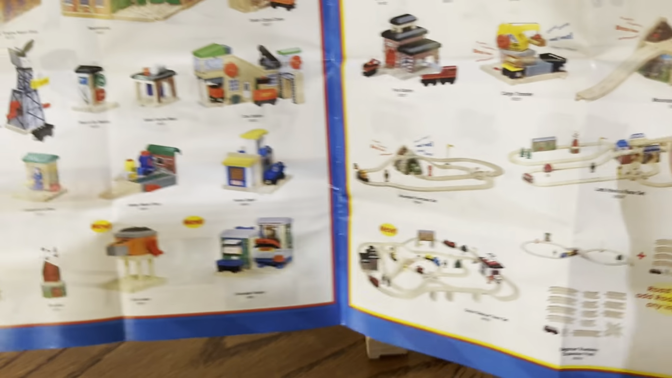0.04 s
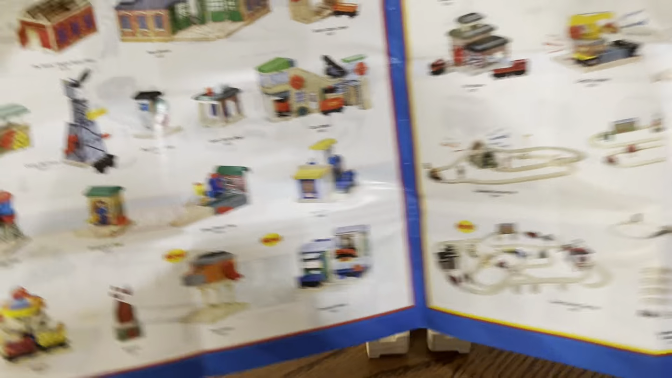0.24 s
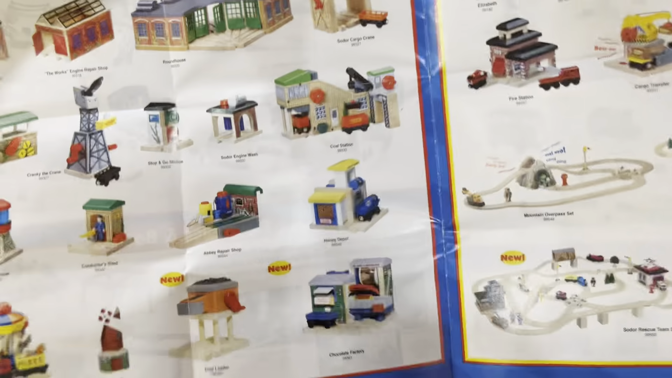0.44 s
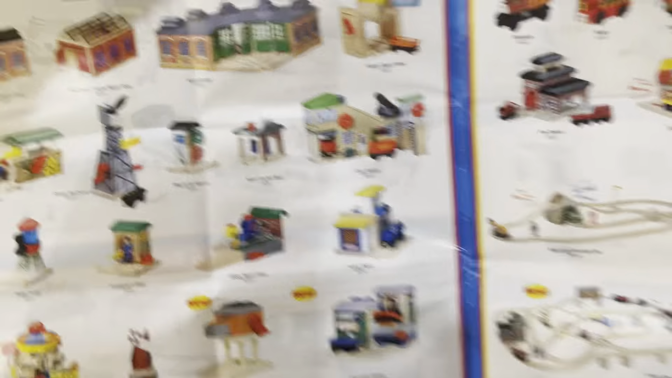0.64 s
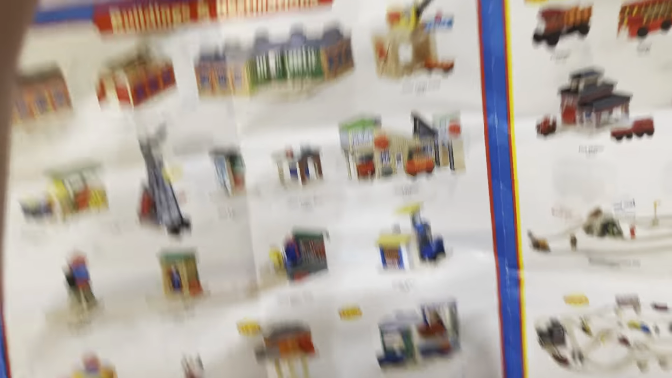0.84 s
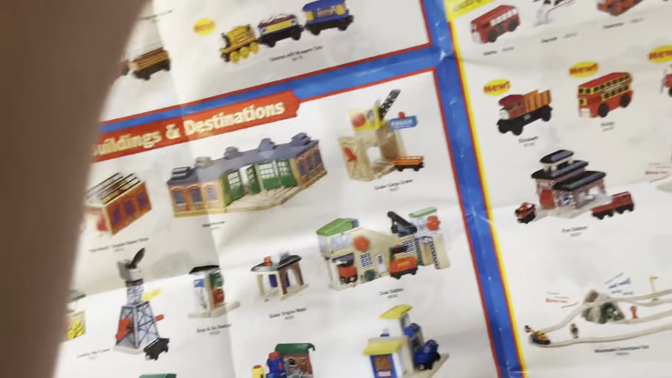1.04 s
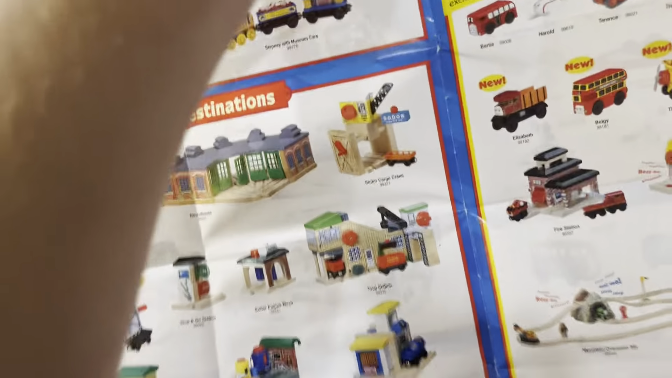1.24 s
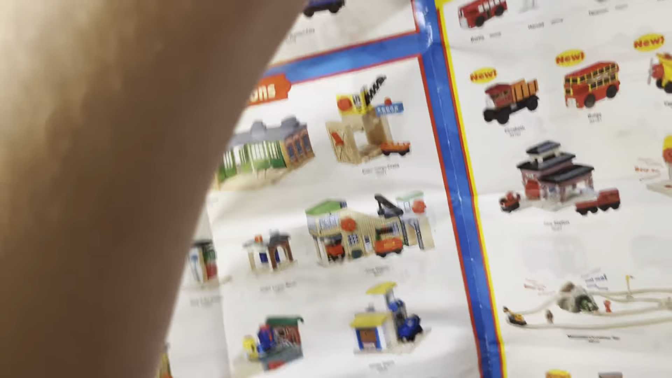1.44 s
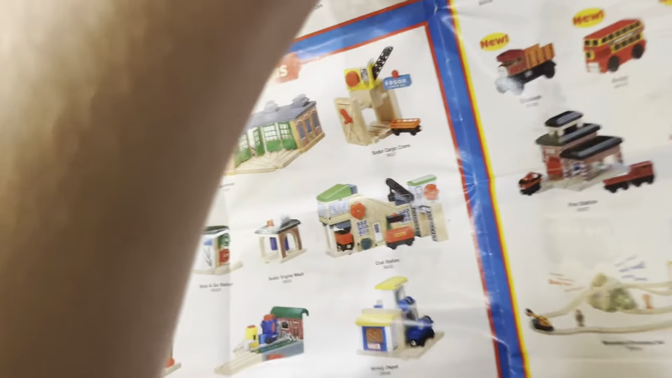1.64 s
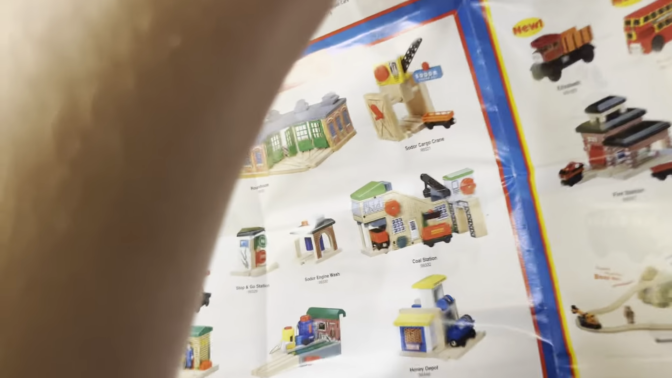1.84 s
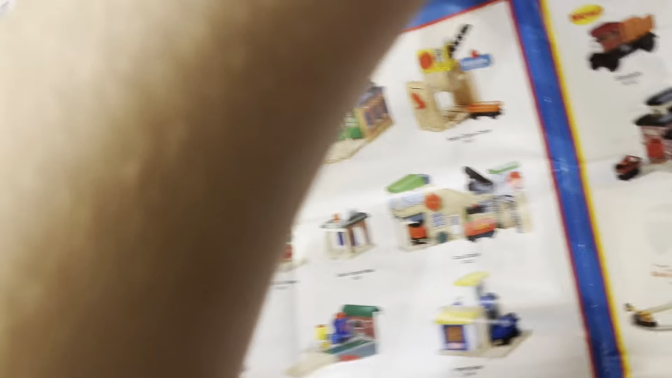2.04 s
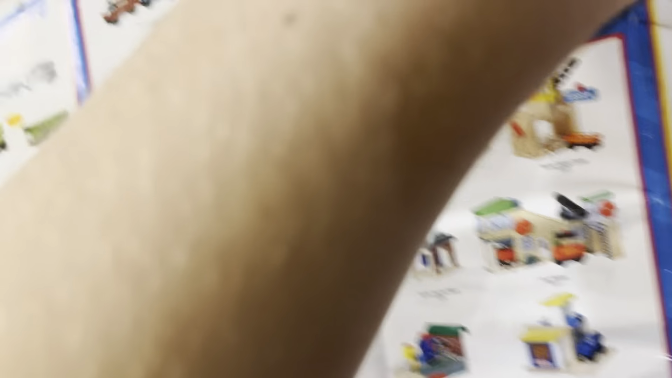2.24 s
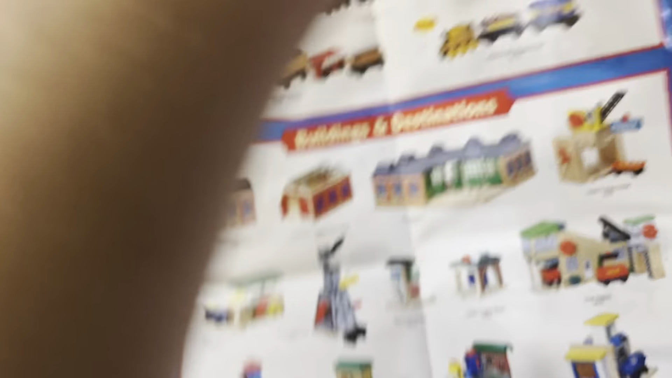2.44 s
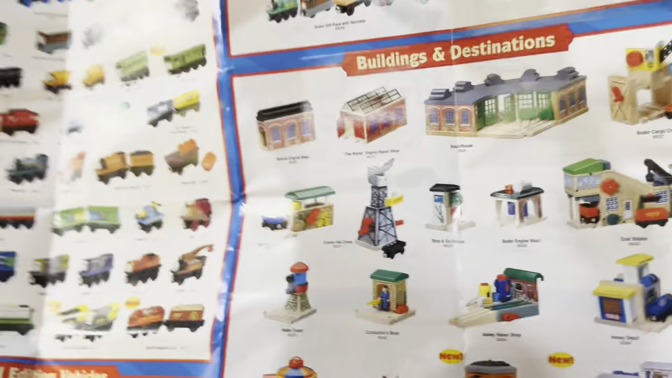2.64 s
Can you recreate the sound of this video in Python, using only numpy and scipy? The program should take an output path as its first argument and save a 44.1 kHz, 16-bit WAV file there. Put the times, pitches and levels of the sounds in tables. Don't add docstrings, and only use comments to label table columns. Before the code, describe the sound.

A large folded paper leaflet is opened and shifted, crinkling and snapping sharply close by.

```python
import sys
import numpy as np
from scipy import signal
from scipy.fft import rfft, irfft, next_fast_len
from scipy.io import wavfile
from scipy.ndimage import uniform_filter1d

SR = 44100
rng = np.random.default_rng(int(sys.argv[2]) if len(sys.argv) > 2 else 0)


def digitize_waveform(pressure):
    field = np.atleast_2d(pressure).T
    bounded = np.clip(field, -1, 1)
    quanta = np.round(bounded * 32767).astype(np.int16)
    wavfile.write(sys.argv[1], SR, quanta)


def natural_amplitude(level_db):
    exponent = np.asarray(level_db, float) / 20
    return 10 ** exponent


N = 119070


def evened(x):
    return x / np.sqrt(np.mean(x ** 2) + 1e-20)


def smooth_twice(x, size, axis=-1):
    return uniform_filter1d(uniform_filter1d(x, size=size, axis=axis), size=size, axis=axis)


def read(points, hz):
    f, value = np.transpose(points)
    return np.interp(np.log(hz + 1), np.log(f + 1), value)


def add(mix, start_s, sound):
    part = mix[:, max(round(start_s * SR), 0):][:, :sound.shape[1]]
    part += sound[:, :part.shape[1]]


# [freq_hz, level_db]
SHEET_COLOUR = [(150, -9.5), (350, 2), (1000, 6), (2400, -1.5), (4400, -1.5), (6000, -5.5), (12000, -3),
                (16500, -9)]
# [freq_hz, t60_s]
SHEET_DECAY = [(150, 0.14), (500, 0.035), (1500, 0.032), (4500, 0.017), (12000, 0.0017)]
BODY_HZ, MID_HZ, SIZZLE_HZ = 554, 2570, 7900
BODY_DB, SIZZLE_DB = 8.5, 18.5
RISE_TURNS = 0.27


def snap(level_db, body_db, sizzle_db, count=100):
    t = np.arange(2600) / SR
    step, size, turn_left, turn_right = rng.random((4, count))
    hz = 150 * 108 ** ((np.arange(count) + step) / count) ** .8
    sizzle_db = sizzle_db + SIZZLE_DB
    colour = [(BODY_HZ, body_db + BODY_DB), (MID_HZ, 0), (SIZZLE_HZ, sizzle_db), (2 * SIZZLE_HZ, 1.9 * sizzle_db)]
    gain = natural_amplitude(read(SHEET_COLOUR, hz) + read(colour, hz) + 9.2 * size)
    phase = np.exp(2j * np.pi * np.array([turn_left, turn_right]))
    modes = np.exp(np.outer(2j * np.pi * hz - np.log(1000) / read(SHEET_DECAY, hz), t))
    rise = np.minimum(t / (RISE_TURNS / hz[:, None] + 0.0006), 1)
    sound = ((gain * phase) @ (modes * rise)).real
    return natural_amplitude(level_db) * sound / abs(sound[0]).max()


# [start_s, level_db, body_db, sizzle_db]
SNAPS = [(0.17, -31.5, -7.5, -34), (0.253, -19, -19, -21.5), (0.293, -16.5, -18, -13.5),
         (0.361, -34, -3, -11), (0.406, -30, 3.5, -11), (0.439, -28, -22.5, -26.5), (0.518, -22, -13, -1),
         (0.546, -29, -16, -54), (0.567, -11.5, -13.5, -10), (0.67, -21, -11.5, -10.5),
         (0.789, -29, 2, -12), (0.809, -7.5, -29, -2.5), (0.865, -11.5, -18.5, -4),
         (0.891, -13.5, -18, -22.5), (1.025, -32, -4, -47), (1.172, -27.5, -11.5, -19),
         (1.369, -33, -2, -11.5), (1.391, -25.5, -10, -12.5), (1.417, -26, -20, -35),
         (1.442, -9.5, -25.5, -7.5), (1.702, -27.5, -2, -41), (1.758, -27, 0.5, -7), (1.881, -37, 5, -51),
         (1.898, -17, -8.5, -50), (2.05, -32, -4, -34), (2.09, -18.5, -17.5, -14),
         (2.306, -30.5, -6, -24.5), (2.337, -31, -8, -13.5), (2.397, -24, -18, -39),
         (2.424, -26.5, -15, -15.5),
         (.003, -27, -16.5, -31), (0.186, -36.5, 26, 2), (.217, -35.5, -3.5, -16.5),
         (0.525, -23, -15.5, -15.5), (.604, -44, -9, -27.5), (0.801, -20, -17.5, -27),
         (0.899, -19, -13.5, -22.5), (0.994, -28.5, -7, -10), (1.664, -35, -9.5, -52),
         (1.809, -40.5, -11.5, -10.5), (1.956, -31, -2.5, -19), (2.063, -29.5, -10, -19),
         (2.262, -45, -7, -19), (2.543, -33.5, 17, -33), (2.696, -41, -10, -20)]
LEAD_S, CLUMP_S_PER_DB, SIDE_DB = 0.0012, .0004, -6


def creases():
    out = np.zeros((2, N))
    for start_s, level_db, body_db, sizzle_db in SNAPS:
        sound = snap(0, body_db, sizzle_db)
        dull_db = np.clip(body_db - sizzle_db + 13.0, 6, 30)
        clump = np.zeros((2, 4000))
        add(clump, LEAD_S, sound)
        for when, size in rng.random((8, 2)):
            spread_s = CLUMP_S_PER_DB * dull_db if size < .8 else 0
            late_s = LEAD_S + spread_s * when if size < .8 else LEAD_S * when
            side_gain = natural_amplitude(SIDE_DB - 9.3 * size - 60 / dull_db) * np.sign(when - .5)
            add(clump, late_s, side_gain * sound)
        add(out, start_s - LEAD_S, natural_amplitude(level_db) * clump / abs(clump[0]).max())
    return out


# [start_s, length_s, slide_db, bend_db]
STROKES = [(-.02, 0.02, -46.5, -45), (0.108, 0.098, -83, -53), (0.224, 0.081, -81, -36),
           (0.345, 0.11, -66, -43), (0.471, 0.14, -58, -38), (0.608, 0.15, -68.5, -52),
           (0.763, 0.15, -53.5, -37.5), (0.834, 0.16, -48.5, -44.5), (0.994, 0.15, -66.5, -49),
           (1.158, 0.031, -49.5, -45), (1.212, 0.13, -65.5, -55.5), (1.341, 0.13, -58, -41),
           (1.462, 0.12, -65, -63), (1.617, 0.11, -61.5, -53), (1.734, 0.053, -49.5, -41.5),
           (1.894, 0.04, -64, -40), (2.037, 0.067, -58.5, -43.5), (2.184, .2, -58.5, -49),
           (2.406, 0.061, -50.5, -53), (2.5, 0.041, -59.5, -53), (2.56, 0.11, -65, -72)]
SLIDE_COLUMN, BEND_COLUMN = 2, 3
STROKE_RISE_S, STROKE_FALL_S, SLIDE_FALL_S = 0.028, 0.025, 0.022


def effort(column, fall_s=STROKE_FALL_S):
    t, power = np.arange(N) / SR, np.zeros(N)
    for row in STROKES:
        start_s, length_s = row[:2]
        rise = np.clip((t - start_s) / STROKE_RISE_S, 0, 1) ** 2
        fall = np.exp(-np.maximum(t - start_s - length_s, 0) / fall_s)
        power += (natural_amplitude(row[column]) * rise * fall) ** 2
    return np.sqrt(power)


def crinkle(per_s=500, spread_db=4.5, level_db=2.5):
    clumps = natural_amplitude(5 * evened(uniform_filter1d(rng.standard_normal(N), size=500)))
    hits = rng.random(N) < per_s / SR * clumps
    size = evened(natural_amplitude(spread_db * np.minimum(rng.exponential(1, N), 3)) * hits)
    size = size * np.sqrt(effort(SLIDE_COLUMN) * effort(BEND_COLUMN))
    kind, out = rng.integers(0, 12, N), np.zeros((2, N))
    for k in range(12):
        grain = snap(0, -16 + k, -25 - 1.5 * k, count=40)[:, :1500]
        grain = grain / np.linalg.norm(grain[0])
        out += signal.oaconvolve((size * (kind == k))[None], grain, axes=1)[:, :N]
    return natural_amplitude(level_db) * out


# [start_s, level_db, pitch_hz]
FLAPS = [(0.021, -44.5, 69), (0.216, -26, 60.6), (0.333, -29, 57.6), (.39, -48, 91.5), (.53, -35, 62.5),
         (0.663, -30.5, 87), (0.788, -20.5, 82.3), (0.918, -33, 92.6), (1.166, -20, 64.9),
         (1.252, -30, 71.6), (1.374, -39, 64), (1.441, -28.5, 66), (1.702, -32.5, 118), (1.76, -39.5, 117),
         (2.059, -34.5, 85.5), (2.311, -36, 82), (2.348, -27.5, 63), (2.422, -36.5, 68.3),
         (2.539, -34, 283)]
FLAP_T60_S, FLAP_RISE_S, FLAP_DB = 0.12, 0.0068, 1.5


def flaps():
    out, t = np.zeros((2, N)), np.arange(8000) / SR
    for start_s, level_db, pitch_hz in FLAPS:
        swing = np.sin(2 * np.pi * pitch_hz * t * (1 - 0.2 * t) + np.array([[0], [1.3]]))
        decay_db = 60 * t * max(pitch_hz / 120, 1) / FLAP_T60_S
        rise = 1 - np.exp(-(t / FLAP_RISE_S) ** 2)
        add(out, start_s, natural_amplitude(level_db + FLAP_DB - decay_db) * rise * swing)
    return out


def rings(table, gain_db, turns):
    out, t = np.zeros((2, N)), np.arange(2000) / SR
    for start_s, level_db, pitch_hz in table:
        off, turn = rng.uniform(-1, 1, 3), rng.random((2, 3))
        hz = pitch_hz * (1 + 0.035 * off * [0, 1, 1])
        modes = np.exp(2j * np.pi * np.outer(hz, t))
        sound = ((np.exp(2j * np.pi * turn) * [1, .5, .5]) @ modes).real
        sound = sound * np.minimum(t * pitch_hz / 1.5, 1) * natural_amplitude(-60 * t * pitch_hz / turns)
        add(out, start_s, natural_amplitude(level_db + gain_db) * sound / abs(sound[0]).max())
    return out


# [start_s, level_db, pitch_hz]
PANELS = [(0.17, -43, 910), (0.252, -24, 1380), (0.293, -22, 1400), (0.424, -38, 825), (0.439, -23, 1540),
          (0.487, -38, 856), (0.547, -21.5, 950), (0.67, -26, 890), (0.89, -14.5, 590), (0.898, -18, 970),
          (0.966, -39, 1080), (1.026, -33, 930), (1.391, -37, 840), (1.418, -25.5, 843),
          (1.663, -31.5, 1440), (1.701, -35, 756), (1.726, -31.5, 660), (1.79, -33, 807),
          (1.904, -20.5, 1050), (1.934, -29, 810), (2.063, -25.5, 778), (2.088, -21.5, 676),
          (2.262, -36, 1210), (2.306, -29, 1420), (2.397, -25, 944), (2.423, -24, 1400), (2.456, -36, 1110)]


def panels():
    return rings(PANELS, gain_db=-4, turns=14)


# [start_s, level_db, pitch_hz]
FACETS = [(0.0867, -48, 2600), (0.2523, -31, 2050), (0.2942, -17, 4160), (0.405, -38, 2500),
          (0.4389, -31, 3620), (0.5452, -28, 2070), (0.5681, -19, 4000), (0.6704, -22, 2300),
          (0.8096, -13, 4440), (0.8649, -12, 2390), (0.8904, -16.5, 2270), (0.9368, -36, 1970),
          (1.4162, -32, 2260), (1.4416, -17, 2480), (1.956, -39, 2290), (2.0892, -18.5, 3770),
          (2.3376, -42, 2150), (2.4239, -30, 2360)]


def facets():
    return rings(FACETS, gain_db=-4, turns=20)


# [start_s, length_s, level_db, pitch_hz]
RASPS = [
    (.508, 0.024, -42, 3060),
    (0.42, 0.0083, -43, 8000),
    (.98, .022, -46.5, 8100),
    (0.69, .03, -45.5, 1700),
    (1.78, 0.05, -52, 7300),
    (2.296, 0.048, -52, 3900),
    (2.6, .015, -52, 4300),
    (2.44, 0.073, -50.5, 7300),
]
RASP_SLIPS_PER_S, RASP_WIDTH = 2800, .4


def rasps():
    out, t = np.zeros((2, N)), np.arange(4000) / SR
    for start_s, length_s, level_db, pitch_hz in RASPS:
        slips = rng.standard_normal((2, 4000)) * (.2 + (rng.random(4000) < RASP_SLIPS_PER_S / SR))
        band_hz = [pitch_hz / (1 + RASP_WIDTH), pitch_hz * (1 + RASP_WIDTH)]
        sos = signal.butter(2, band_hz, "band", fs=SR, output="sos")
        swell = np.sin(np.pi * np.minimum(t / length_s, 1)) ** 2
        add(out, start_s, natural_amplitude(level_db) * evened(signal.sosfilt(sos, slips)) * swell)
    return out


def texture(colour, patchy_db, flicker_db, size):
    frames, hz = 4 * N // size + 5, np.fft.rfftfreq(size, 1 / SR)
    a, b, c, d, patches = rng.standard_normal((frames, len(hz), 5)).T
    patches = uniform_filter1d(uniform_filter1d(patches, size=9, axis=0), size=9, axis=1)
    flicker = evened(uniform_filter1d(rng.standard_normal(frames), size=5))
    level_db = read(colour, hz)[:, None] + patchy_db * evened(patches) + flicker_db * flicker
    z = np.array([a + 1j * b, c + 1j * d]) * natural_amplitude(level_db)
    return evened(signal.istft(z, nperseg=size, noverlap=3 * size // 4)[1][:, :N])


# [freq_hz, level_db]
HISS = [(300, -18), (1000, -24), (3000, -3), (6000, -6), (8500, 4), (11500, -12.5), (14300, -9.5),
        (15300, -29.5)]


def slide():
    hiss = texture(HISS, patchy_db=2.5, flicker_db=2.5, size=256)
    return effort(SLIDE_COLUMN, SLIDE_FALL_S) * hiss


# [freq_hz, level_db]
RUMBLE = [(25, -37.5), (62, 1.5), (120, -1.5), (190, -12.5), (320, -11.5), (600, -24), (1300, -37),
          (4000, -48.5)]


def bend():
    return effort(BEND_COLUMN) * texture(RUMBLE, patchy_db=2.5, flicker_db=1.5, size=1024)


# [freq_hz, t60_s]
ROOM_DECAY = [(100, 0.44), (1000, 0.18), (14000, 0.089)]
ROOM_DB = -14


def room(x):
    taps = np.zeros((2, SR // 2))
    at = np.arange(120, SR // 2 - 20, 20)
    signs = rng.choice([-1., 1.], (2, len(at)))
    np.put_along_axis(taps, at + rng.integers(0, 20, (2, len(at))), signs, 1)
    hz, t, z = signal.stft(taps, SR, nperseg=128)
    tail = signal.istft(z * natural_amplitude(-60 * t / read(ROOM_DECAY, hz)[:, None]), SR, nperseg=128)[1]
    return natural_amplitude(ROOM_DB) * signal.fftconvolve(x[:1], tail / np.linalg.norm(tail[0]), axes=1)[:, :N]


# [freq_hz, level_db]
AIR = [(25, -29), (65, 12), (130, -14.5), (300, -12.5), (1500, -18), (6000, -30), (14300, -41.5),
       (15300, -55.5)]
AIR_DB = -61.5


def still_air():
    return natural_amplitude(AIR_DB) * texture(AIR, patchy_db=1.5, flicker_db=1, size=1024)


def scene():
    paper = creases() + crinkle() + flaps() + panels() + facets() + rasps()
    return paper + room(paper) + slide() + bend() + still_air()


# [freq_hz, left_lead_rad]
PORT_PHASE = [(0, 0), (1100, -.1), (1550, -2.3), (1900, .3), (4400, 1), (6500, -1), (7800, -3),
              (8800, -3.25), (11000, -6.05), (13000, -6.5), (14800, -9.1), (16500, -10.3)]
# [freq_hz, likeness_0_to_1]
PORT_LIKENESS = [(60, .98), (250, .8), (700, .45), (1500, .6), (3000, .75), (5500, .85), (7600, .9995)]
# [freq_hz, left_minus_right_db]
PORT_LEAN = [(60, .5), (240, 1.5), (1000, .5), (3000, 1.3), (7500, 0)]
# [freq_hz, level_db]
MIC = [(22, -8), (45, 1), (450, 0.5), (720, -3.5), (1100, -2), (14500, 2), (15700, 6), (16300, -1)]


def two_ports(dry):
    size = next_fast_len(N + 4096)
    hz, (a, b) = np.fft.rfftfreq(size, 1 / SR), rfft(dry, size, axis=1)
    same = np.clip(read(PORT_LIKENESS, hz), 0, 1)
    lean = np.sqrt(natural_amplitude(read(PORT_LEAN, hz)))
    turn = np.exp(.5j * np.interp(hz, *np.transpose(PORT_PHASE)))
    left = a * turn * lean
    right = (same * a + np.sqrt(1 - same ** 2) * b) / turn / lean
    return irfft(np.array([left, right]) * natural_amplitude(read(MIC, hz)), size, axis=1)[:, :N]


# [time_s, left_minus_right_db]
HAND_SIDE = [
    (0, 3),
    (.5, 3),
    (1.1, 3),
    (1.45, 1.5),
    (1.9, -1.5),
    (2.1, 2.5),
    (2.6, 3),
]


def hand_side(ports):
    lean_db = np.interp(np.arange(N) / SR, *np.transpose(HAND_SIDE)) - 2
    side = natural_amplitude(lean_db) ** np.array([[.5], [-.5]])
    mid = smooth_twice(ports, 5) - smooth_twice(ports, 151)
    return ports + (side - 1) * mid


def top_cut(x):
    return signal.sosfilt(signal.butter(12, 16550, fs=SR, output="sos"), x)


def record(dry):
    return top_cut(hand_side(two_ports(dry)))


dry = scene()
out = record(dry)
digitize_waveform(out)
```